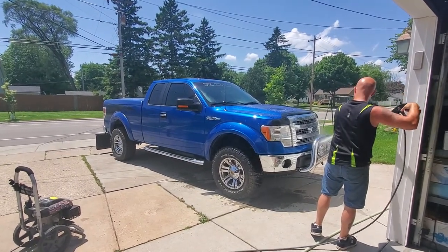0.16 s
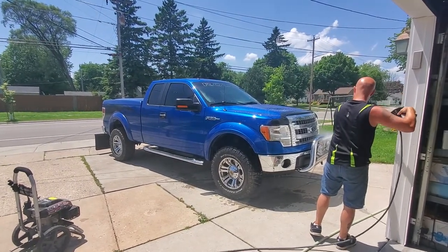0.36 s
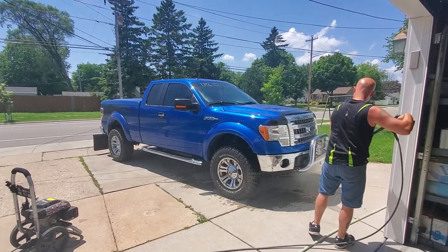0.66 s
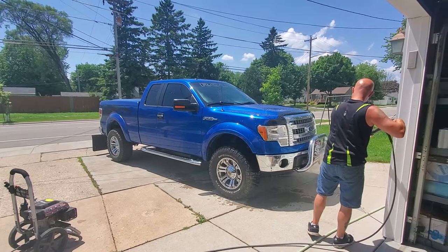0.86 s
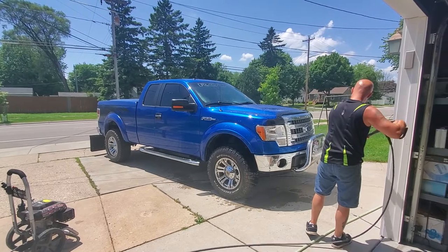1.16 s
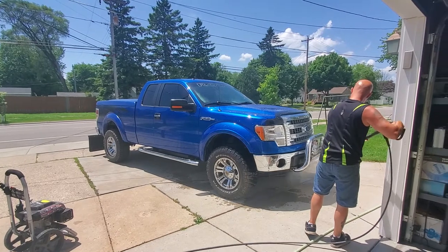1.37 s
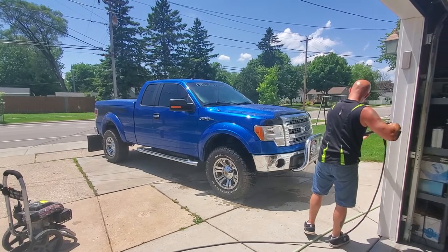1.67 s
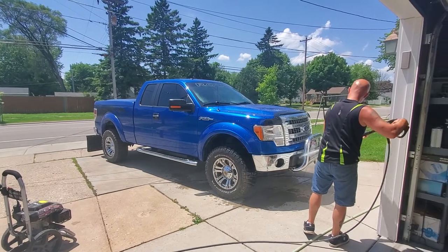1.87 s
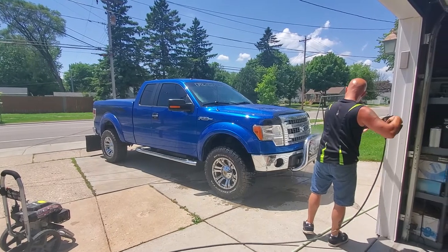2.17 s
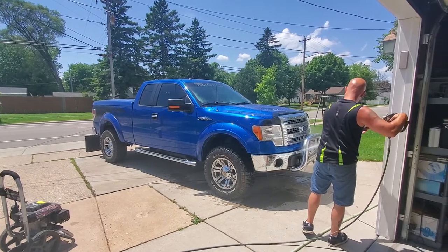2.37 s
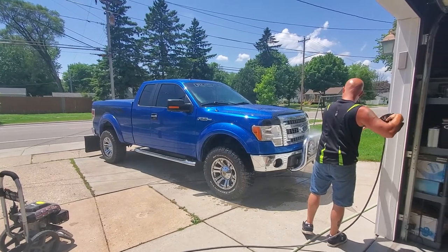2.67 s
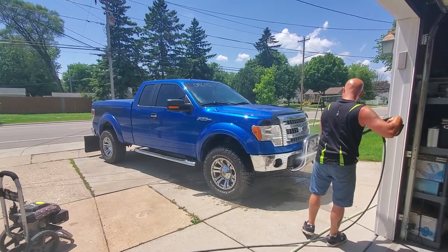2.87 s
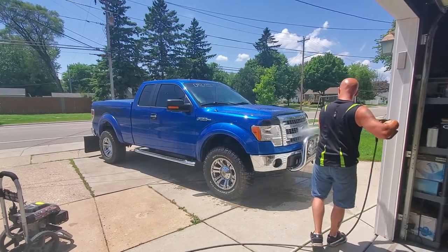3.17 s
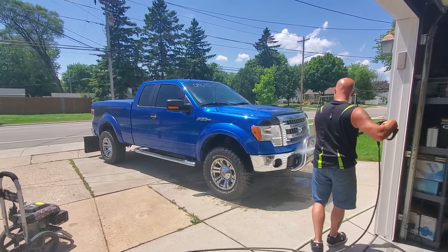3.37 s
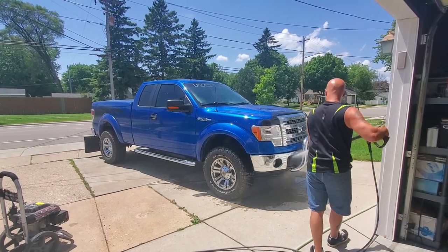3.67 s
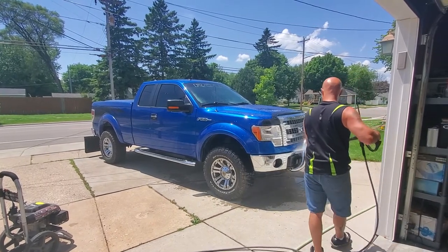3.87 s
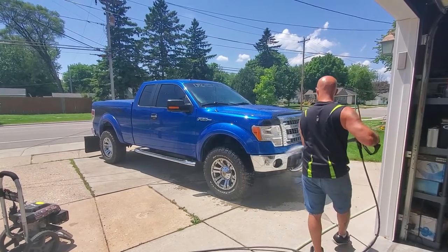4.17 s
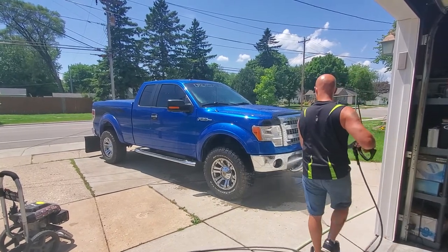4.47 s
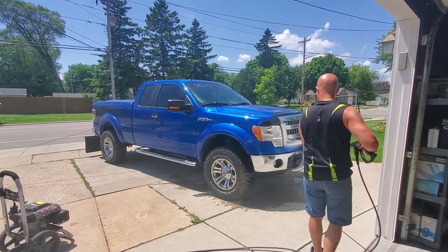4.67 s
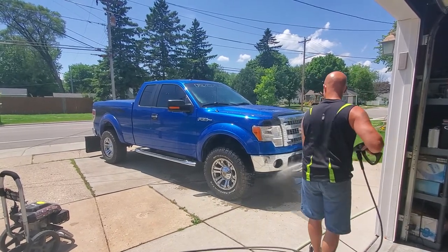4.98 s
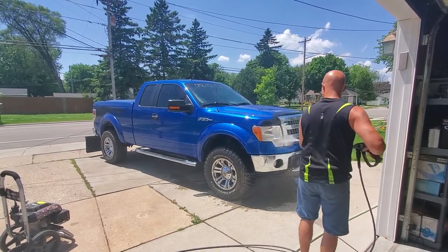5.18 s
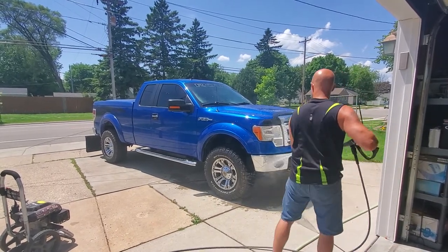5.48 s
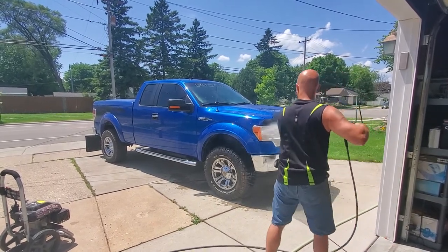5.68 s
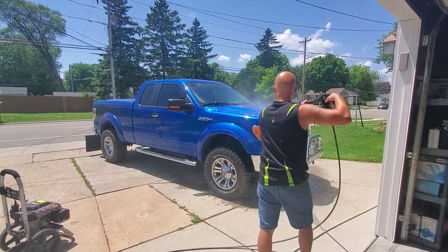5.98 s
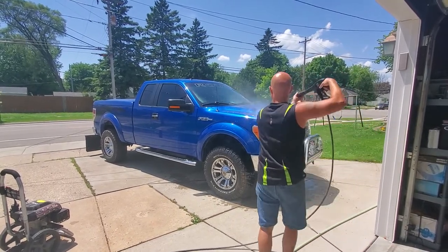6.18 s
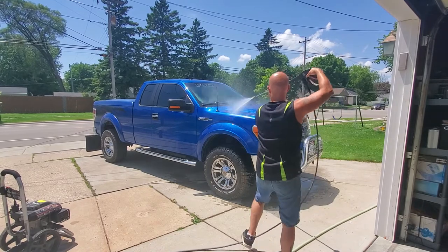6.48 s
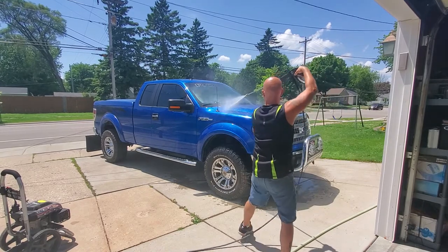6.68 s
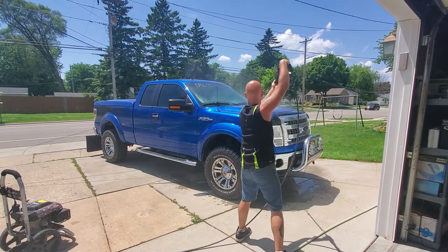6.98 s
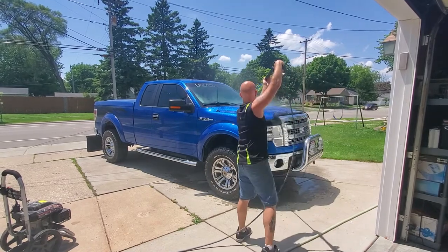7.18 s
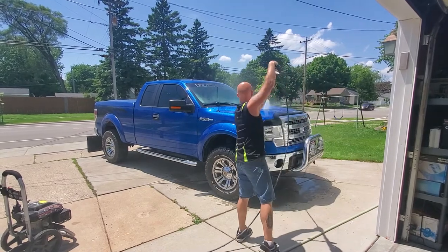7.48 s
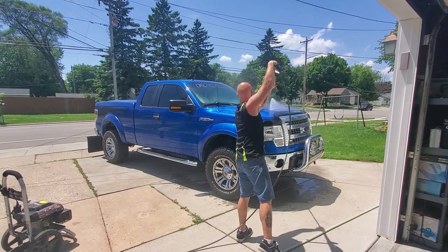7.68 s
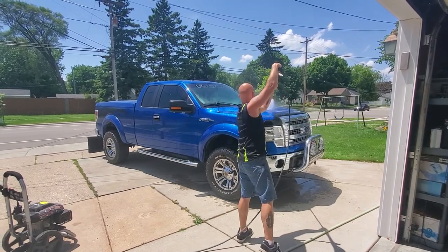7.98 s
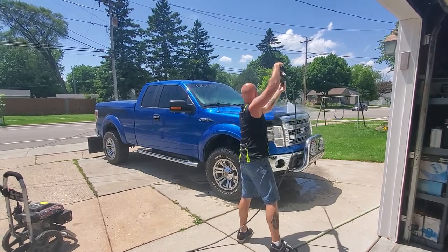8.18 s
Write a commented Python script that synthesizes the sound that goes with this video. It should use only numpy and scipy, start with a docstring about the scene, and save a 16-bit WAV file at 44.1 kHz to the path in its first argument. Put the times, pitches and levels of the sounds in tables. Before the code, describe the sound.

A petrol pressure washer runs on a driveway for the whole eight seconds or so, slightly to the left. Its single cylinder fires at a fast, even rate, making a low thumping drone with spitting exhaust, a tinny muffler ring, clattering valves and pistons, a faint wavering whine and a rush of air and water. One firing cracks harder near 1 second, and a few milder ones follow. Over the engine, a water jet hisses on a truck from the start, with a fine patter of droplets. The hiss swells and dips a little under twice a second, most clearly around 3 seconds, is loudest from about 3.5 to 5 seconds, then gradually softens, swelling again just at the end. Around 7 seconds a bright, rapid tick comes forward in the exhaust. The space is open, with short reflections from nearby walls.

```python
"""A petrol pressure washer runs on a driveway, to the left of a garage door, while its jet sweeps a truck.
From the start its one cylinder fires about 29 times a second: each firing thumps the muffler, spits gas
and rings the metal shell, over clattering valves and pistons, shaft whine and a rush of air and water.
Near 1 s one firing cracks hard; a few milder ones follow. The hissing jet swings across the grille, dwells
on the bumper, then rises over the bonnet. Around 7 s a bright tick comes forward in the exhaust."""
import sys
import numpy as np
from scipy import signal
from scipy.fft import rfft, irfft, next_fast_len
from scipy.io import wavfile
from scipy.ndimage import uniform_filter1d, map_coordinates

SR = 44100
rng = np.random.default_rng(int(sys.argv[2]) if len(sys.argv) > 2 else 0)


def to_wav(sig):
    """Store sig (one row per channel, or 1-D mono) as 16-bit WAV at the path in sys.argv[1].

    Samples outside -1..1 are clipped; the rate is SR.
    """
    pcm = np.clip(np.atleast_2d(sig), -1, 1) * 32767
    pcm = np.round(pcm).astype(np.int16)
    wavfile.write(sys.argv[1], SR, pcm.T)  # frames by channels


N = 367353
FIRING_HZ = 29.156  # the governor holds the engine at this rate


def thump(cycles, burn_db, db=-21.0, follow=0.16, scatter_db=0.75, intake_at=.736,
          low_hz=45, high_hz=335, side_db=1.0):
    """Each firing pushes a pulse through the muffler; later in the cycle the intake gulps air."""
    # air in the exhaust pipe and muffler: pitch_hz, width_hz, signed gain
    muffler = [(57, 24, -0.58), (164.5, 30.7, 0.63), (247.6, 19.6, 0.19), (294.2, 32.5, -0.34)]
    # air box of the carburettor: pitch_hz, width_hz, gain
    airbox = [(125, 96, 0.15)]
    firing = np.arange(len(burn_db))
    sizes = amp(follow * burn_db + scatter_db * rng.standard_normal(len(firing)))
    exhaust = resonate(pulses(when(cycles, firing), sizes), muffler)
    intake = resonate(pulses(when(cycles, firing + intake_at), np.ones(len(firing))), airbox)
    # the deepest bass and the upper harmonics are rolled off, leaving a round thump
    passband = lambda hz: ((1 + (low_hz / (hz + 1)) ** 8) * (1 + (hz / high_hz) ** 12)) ** -.5
    body = unit(filtered(exhaust + intake, passband))
    return amp(db) * from_left(body) * amp([[side_db], [-side_db]])


def puffs(cycles, burn_db, db=-26.0, follow=0.78, delay_s=0.00062, open_s=0.0007, empty_s=0.0049):
    """Gas cracks out as the exhaust valve opens and dies as the cylinder empties."""
    # gas leaving the muffler: freq_hz, left_db, right_db
    gas_colour = [(300, -28, -36), (700, -1, -7), (1600, -5.5, -12.5), (2370, 0.5, 3.5), (3780, 1.5, -32),
                  (4170, -4, -28), (5260, -11, -9), (7000, -7, -17), (7070, -15, -49), (8760, -5.5, -14),
                  (10140, -3, 0.5), (12900, 4, -9), (13900, 5, -35), (16000, -9.5, -39)]
    # a bright tick in the puffs that comes forward late on: time_s, level_db
    tick_fader = [(0, -45), (6.6, -49), (7.1, -38), (8.3, -41)]
    stroke = cycles - delay_s * FIRING_HZ
    age_s = stroke % 1 / FIRING_HZ
    size = amp(follow * burn_db[np.floor(stroke).astype(int)])
    envelope = size * (1 - np.exp(-age_s / open_s)) * np.exp(-(age_s / empty_s) ** 2)
    gas = yard(off_wall(envelope * machine_noise()), wet_db=-1)
    tick_band = resonate(gas, [(4900, 690, 1)])
    tick = unit(tick_band * amp([[0], [-6]]))  # leans left
    spit = shimmer(coloured(gas, gas_colour), depth_db=2.06)
    return amp(db) * spit + amp(curve(tick_fader)) * tick


def pings(cycles, burn_db, delay_s=.0012, jitter_s=.0004, attack_s=0.00068, scatter_db=4):
    """The exhaust blow sets the muffler shell ringing, each mode at a new strength every time."""
    # sheet-metal shell of the muffler: pitch_hz, t60_s, left_db, right_db
    shell_modes = [(1657, 0.029, -33.5, -36.5), (2315, 0.038, -46.5, -50), (2464, 0.023, -37.5, -43.5),
                   (3810, 0.019, -35.5, -64), (3930, 0.062, -35.5, -51), (5240, 0.019, -43, -66),
                   (10260, 0.018, -40.5, -51), (12000, .007, -33.5, -53), (14600, .012, -42, -54)]
    t, count = np.arange(SR // 8) / SR, len(burn_db)
    firings_s = when(cycles, np.arange(count)) + delay_s
    shell = 0
    for hz, t60_s, left_db, right_db in shell_modes:
        times = firings_s + jitter_s * rng.standard_normal(count)
        blows = pulses(times, amp(burn_db + scatter_db * vary(count)))
        ring = np.sin(2 * np.pi * hz * t) * amp(-60 * t / t60_s) * (1 - np.exp(-t / attack_s))
        shell = shell + amp([[left_db], [right_db]]) * unit(signal.fftconvolve(blows, ring)[:N])
    return from_left(shell)


def crank(first_firing_s=.0173, hunting=.003, drift=.007):
    """Engine cycles done at each sample, one firing per whole number; the governor lets the speed stray."""
    steady = FIRING_HZ * (np.arange(N) / SR - first_firing_s)
    return steady + hunting * wobble(14) + drift * wobble(3)


def burns(cycles, scatter_db=3.0):
    """Strength of each firing in dB: no two burn alike, and a few crack hard."""
    # accented firings: time_s, strength_db over the usual burn
    hard_firings = [(.95, 5.5), (1.46, 1.5), (2.9, 2.5), (4.34, 3), (5.13, 2.5), (6.85, 3), (7.15, 4)]
    burn_db = scatter_db * vary(int(cycles[-1]) + 3)
    time_s, strength_db = np.transpose(hard_firings)
    nearest_firing = np.round(np.interp(time_s * SR, np.arange(N), cycles)).astype(int)
    burn_db[nearest_firing] = strength_db
    return burn_db


def spray(db=-23.5, flutter_db=0.78, drop_db=-7, drop_count=12000):
    """The jet hisses; countless droplets tick on the paint."""
    # the jet and its spray on the bodywork: freq_hz, left_db, right_db
    jet_colour = [(500, -16, -27), (2500, -3, -3.5), (4500, -6, -17), (6930, -4.5, -10.5), (7450, -23, -14),
                  (7900, -13, -15), (9560, -8.5, -3.5), (10700, 1, -9), (12100, 0, -0.5), (13600, -2.5, -1),
                  (14600, 3.5, -9), (17000, 2.5, -22)]
    drops = [pulses(rng.random(drop_count) * N / SR, rng.laplace(size=drop_count)) for _ in range(2)]
    hiss = rng.standard_normal((2, N)) + amp(drop_db) * unit(np.array(drops))
    level_db = db + lance() + flutter_db * wobble(11)
    return amp(level_db) * shimmer(coloured(hiss, jet_colour), depth_db=1.5)


def lance(pass_s=0.58, square_on_s=0.65):
    """The spray's level ride in dB: it follows the aim and swells at each pass of the swinging jet."""
    # the jet's path over grille, bumper and bonnet: time_s, level_db, swing_db
    aim = [(.25, -1, 0), (.7, 0.5, 1), (2.4, 0.4, 0.7), (3, 0, 2.7), (3.7, 2, -1), (4.7, 2, 0.8),
           (5.45, 0.7, -0.5), (5.8, -0.6, 0), (7.9, -3.5, 0.5), (8.3, -1.7, 3)]
    t = np.arange(N) / SR
    time_s, level_db, swing_db = np.transpose(aim)
    swing = np.cos(2 * np.pi * (t - square_on_s) / pass_s)
    return np.interp(t, time_s, level_db) + np.interp(t, time_s, swing_db) * swing


def rush(cycles, db=-26.5, throb_db=-0.5, waver_db=1.5):
    """Fan air and pumped water, swelling once with each turn of the shaft."""
    # cooling fan and water rushing in the pump: freq_hz, left_db, right_db
    rush_colour = [(30, -8, -6), (129, -7, 1.5), (320, -6, -4.5), (580, -8, -13.5), (870, -5, -7.5),
                   (1130, -8.5, -11), (1770, 0, -7), (1934, -5, -12), (2310, 3, -6), (2830, -7, -13.5),
                   (3690, -1.5, -19), (4340, -8.5, -18), (6740, -27.5, -20.5), (9150, -38, -56)]
    throb = throb_db * np.cos(4 * np.pi * cycles)  # two shaft turns to a cycle
    return amp(db + throb + waver_db * wobble(8.1)) * coloured(machine_noise(), rush_colour)


def clatter(cycles, db=-31, scatter_db=3, jitter_s=.00014):
    """Valves and pump pistons knock at the same shaft angles in every cycle."""
    # knock pattern of one engine cycle: position_cycles, level_db
    knocks = [(0.035, -3.5), (0.125, -7), (0.32, -2), (.445, -5), (0.645, -7.5), (0.72, -7), (.8, -4.5),
              (.89, -9), (.97, -7.5)]
    # body tone of the crankcase and frame: freq_hz, level_db
    crankcase = [(200, -26), (400, -17.5), (580, -6), (720, -6.5), (980, 3), (1200, -0.5), (1700, -1),
                 (2000, 1.5), (2350, 2), (2900, -1), (3800, -2), (5000, -20), (9000, -38.5)]
    position, level_db = np.transpose(knocks)
    marks = np.arange(-1, cycles[-1])[:, None] + position
    times = when(cycles, marks) + jitter_s * rng.standard_normal(marks.shape)
    blows = pulses(times, amp(level_db + scatter_db * vary(marks.shape)))
    rattle = from_left(struck(blows, crankcase))
    return amp(db) * unit(yard(rattle, wet_db=-4.5))


def whine(cycles, db=-1.0, waver_db=2.5):
    """Crankcase and pump sing wavering tones locked to the shaft."""
    # partials of the whine: multiple of the firing rate, left_db, right_db (before the overall gain)
    partials = [(14, -47, -47), (15, -46.5, -46.5), (18, -48, -49), (24, -45, -50), (25, -44, -46),
                (29, -44, -45), (31, -48, -50), (32, -45, -46), (34, -45, -46)]
    tones = 0
    for order, left_db, right_db in partials:
        tone = np.sqrt(2) * np.sin(2 * np.pi * (order * cycles + rng.random()))
        tones = tones + amp([[left_db], [right_db]]) * amp(waver_db * wobble(12)) * tone
    return amp(db) * from_left(tones)


def machine_noise():
    """White stereo noise: part straight from the machine, part scattered."""
    # likeness of the machine's sound on left and right: freq_hz, share (0-1)
    likeness = [(200, 0.98), (1200, 0.77), (2400, 0.68), (3300, 0.31), (12000, 0.27)]
    share = lambda hz: np.clip(along(likeness, hz), 0, 1)
    direct = filtered(from_left(rng.standard_normal(N)), lambda hz: np.sqrt(share(hz)))
    scattered = filtered(rng.standard_normal((2, N)), lambda hz: np.sqrt(1 - share(hz)))
    return direct + scattered


def from_left(x):
    """Sound from the machine reaches the right microphone a little later."""
    # left-to-right lag; treble takes longer round the microphones' housing: freq_hz, delay_s
    lag = [(1000, .00027), (1650, .00031), (2400, .00035), (4000, .00028)]
    delayed = lambda hz: np.exp(-2j * np.pi * hz * along(lag, hz)[0])
    return filtered(x, lambda hz: np.array([np.ones_like(hz), delayed(hz)]))


def off_wall(x, db=-11, delay_s=.008):
    """x plus its reflection from the garage front."""
    return filtered(x, lambda hz: 1 + amp(db) * np.exp(-2j * np.pi * hz * delay_s))


def yard(x, wet_db):
    """x plus the short scatter from ground, walls and truck."""
    # reverb off the garage front and the truck: freq_hz, t60_s
    decay = [(300, 0.02), (2400, 0.27), (5000, 0.17), (12000, 0.028)]
    hz, t, noise = signal.stft(rng.standard_normal((2, SR // 8)), SR, nperseg=128)
    tail = signal.istft(noise * amp(-60 * t / along(decay, hz).T), SR, nperseg=128)[1]
    tail /= np.linalg.norm(tail, axis=1, keepdims=True)
    return x + amp(wet_db) * signal.fftconvolve(x, tail, axes=1)[:, :N]


def shimmer(x, depth_db, full_hz=7000):
    """The treble of x shifts colour in slow random patches."""
    hz, _, bands = signal.stft(x, SR, nperseg=512)
    patches = uniform_filter1d(rng.standard_normal(bands.shape), size=5, axis=1)  # across frequency
    patches = uniform_filter1d(patches, size=45, axis=2)  # across time
    treble = np.clip(hz / full_hz, 0, 1)[:, None] ** 2
    return signal.istft(bands * amp(depth_db * treble * unit(patches)), SR, nperseg=512)[1][:, :N]


def struck(x, spectrum, size=16384):
    """x rings a body with the given spectrum; minimum phase puts the ring after each blow."""
    magnitude = amp(along(spectrum, np.fft.rfftfreq(size, 1 / SR))[0])
    cepstrum = irfft(np.log(magnitude))
    ring = irfft(np.exp(rfft(2 * cepstrum[:size // 2], size)))
    return unit(signal.fftconvolve(x, ring)[:N])


def resonate(x, modes):
    """x through resonances given as (pitch_hz, width_hz, gain)."""
    return filtered(x, lambda f: sum(gain * 1j * f * width / (hz * hz - f * f + 1j * f * width)
                                     for hz, width, gain in modes))


def coloured(x, spectrum):
    """x through an EQ curve, at rms 1."""
    return unit(filtered(x, lambda hz: amp(along(spectrum, hz))))


def filtered(x, response):
    """x through a frequency response."""
    size = next_fast_len(N + SR // 4)
    return irfft(rfft(x, size) * response(np.fft.rfftfreq(size, 1 / SR)), size)[..., :N]


def pulses(times, sizes):
    """One impulse of each size at each time."""
    inside = (times >= 0) & (times < (N - 1) / SR)
    return np.bincount(np.round(times[inside] * SR).astype(int), sizes[inside], N)


def when(cycles, marks):
    """Times in seconds at which the engine passes the given cycle marks."""
    return np.interp(marks, cycles, np.arange(N) / SR, left=-1, right=-1)


def along(points, hz):
    """Each column of a frequency table, read on a log axis."""
    knots_hz, *columns = np.transpose(points)
    return np.array([np.interp(np.log(hz + 1), np.log(knots_hz + 1), column) for column in columns])


def curve(rows):
    """One value per sample from (time_s, value) rows."""
    return np.interp(np.arange(N) / SR, *np.transpose(rows))


def wobble(rate):
    """A smooth random curve, rate knots a second."""
    return map_coordinates(rng.standard_normal(int(N * rate / SR) + 4), [np.arange(N) * rate / SR])


def vary(shape):
    """Random values between -1 and 1."""
    return np.tanh(rng.standard_normal(shape))


def amp(db):
    """Decibels to gain."""
    return 10 ** (np.asarray(db) / 20)


def unit(x):
    """x at rms 1."""
    return x / np.sqrt(np.mean(x ** 2) + 1e-20)


def scene():
    """Engine and pump run off one shaft, with the spray on top."""
    cycles = crank()
    burn_db = burns(cycles)
    engine = thump(cycles, burn_db) + puffs(cycles, burn_db) + pings(cycles, burn_db)
    return engine + clatter(cycles) + whine(cycles) + rush(cycles) + spray()


def record(dry):
    """A soft clip rounds the tallest peaks and a steep low-pass cuts the very top."""
    ceiling, top_hz = .95, 15830
    rounded = dry / (1 + np.abs(dry / ceiling) ** 8) ** (1 / 8)
    return filtered(rounded, lambda hz: hz < top_hz)


dry = scene()
out = record(dry)
to_wav(out)
```